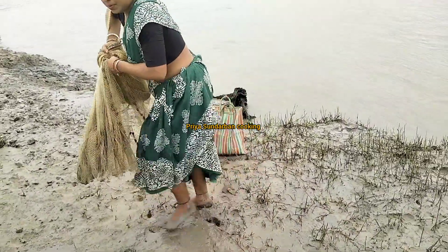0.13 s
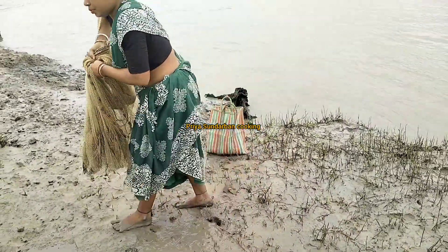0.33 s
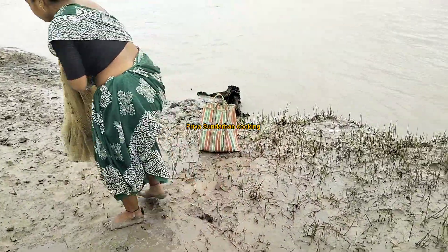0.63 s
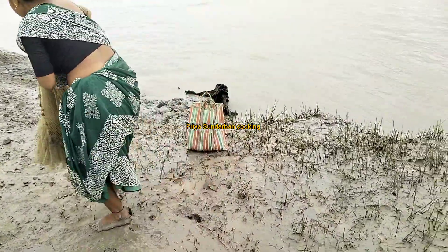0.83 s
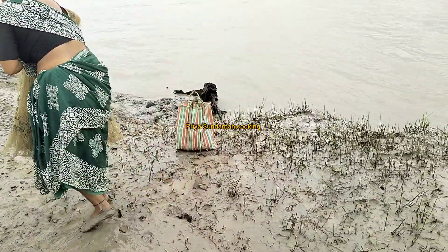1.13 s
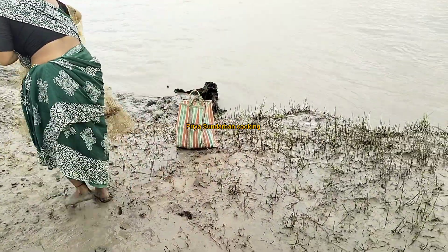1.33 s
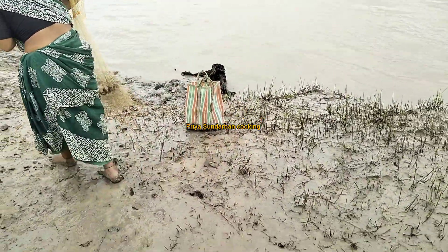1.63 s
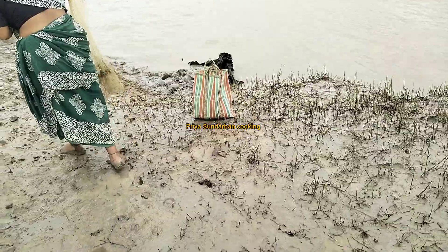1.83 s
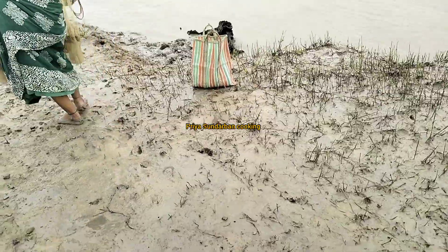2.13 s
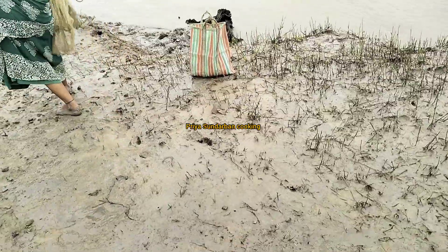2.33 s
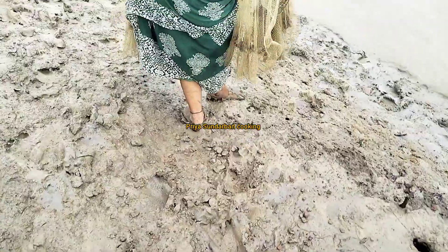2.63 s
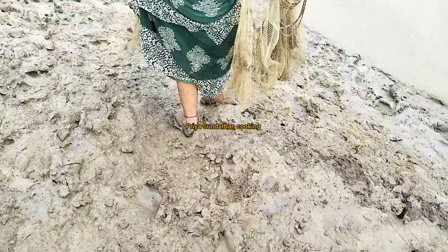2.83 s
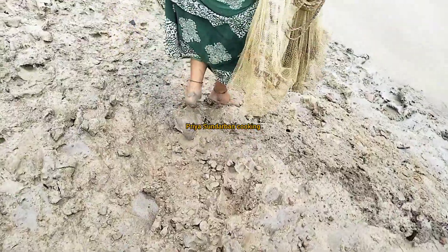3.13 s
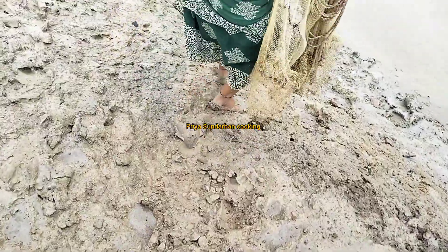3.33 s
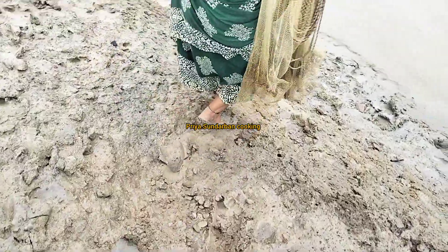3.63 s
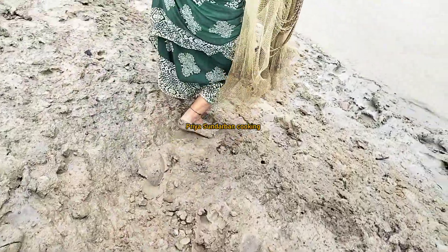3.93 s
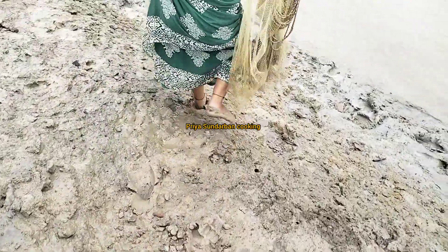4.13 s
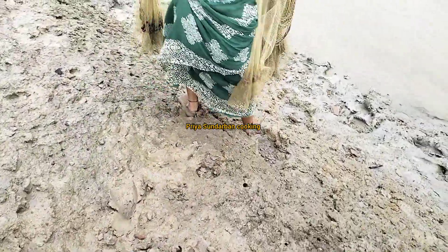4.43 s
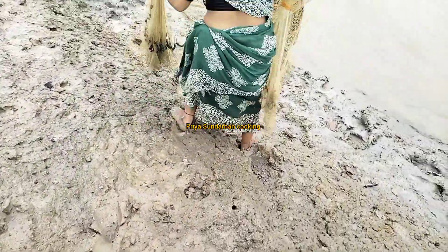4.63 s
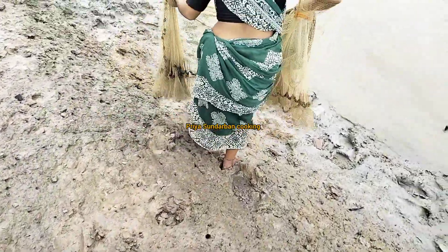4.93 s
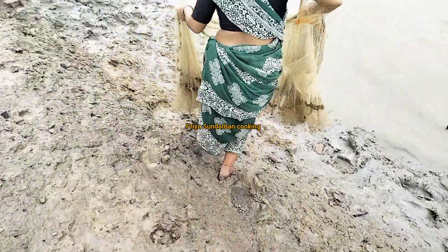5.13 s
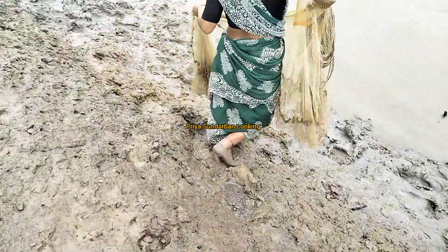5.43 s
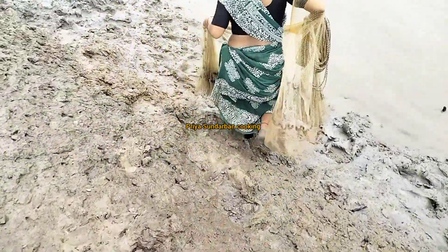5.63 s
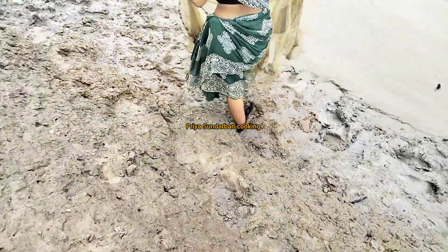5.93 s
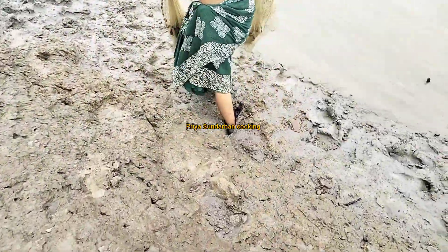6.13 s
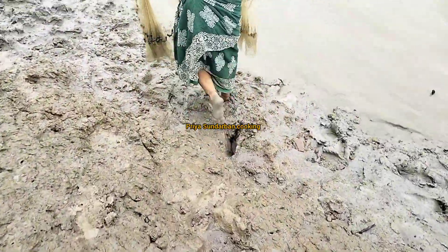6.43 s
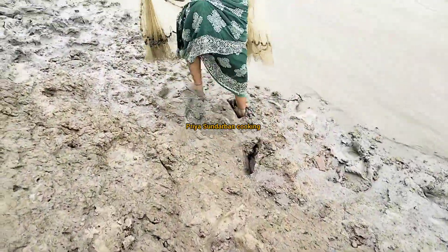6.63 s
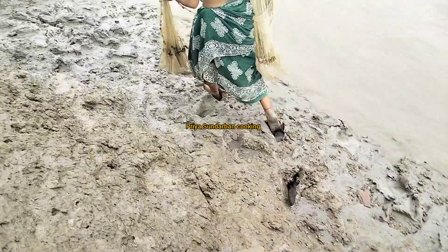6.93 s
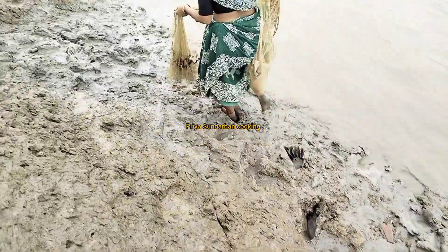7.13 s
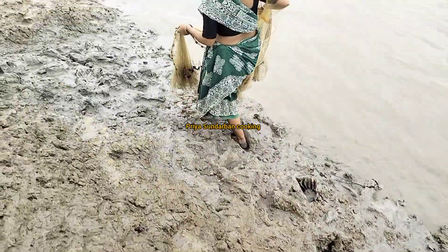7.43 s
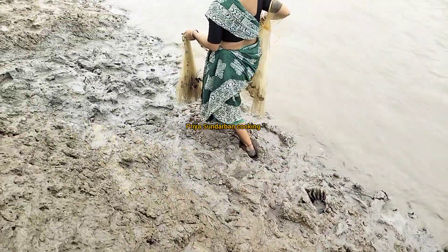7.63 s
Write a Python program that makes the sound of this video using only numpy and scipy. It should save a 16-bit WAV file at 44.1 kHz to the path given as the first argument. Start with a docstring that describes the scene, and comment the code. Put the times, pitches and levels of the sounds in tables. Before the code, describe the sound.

Close, ragged wet mud footsteps with sticky clicks and gurgling seepage over gusty microphone rumble, interrupted by one brief complete silence.

```python
"""Bare feet in riverbank mud

Wet smacks and squelches are ragged noise bursts ringing a footprint and two microphone ports.
Air pockets are gliding sines, heel thuds decaying ones; bubbles are random short sine pops.
Stick-slip jerks and ringing knocks strike mainly the right port; shaped noise makes wind, with a moan.
Seeping water gurgles and fizzes under a brief faint tone; all sound is muted for half a second."""
import sys
import numpy as np
from scipy import signal
from scipy.fft import rfft, irfft, next_fast_len
from scipy.io import wavfile
from scipy.ndimage import uniform_filter1d

SR = 44100
rng = np.random.default_rng(int(sys.argv[2]) if len(sys.argv) > 2 else 0)


def inscribe(sig):
    """Save sig as 16-bit PCM at rate SR to the path in sys.argv[1].

    A 1-D sig is mono; a 2-D sig holds one channel per row.
    Samples are clipped to [-1, 1] before scaling.
    """
    pcm = np.round(np.clip(np.atleast_2d(sig).T, -1, 1) * 32767)
    wavfile.write(sys.argv[1], SR, pcm.astype(np.int16))


N = 343980
FALL = np.log(1000)  # 60 dB decay, nepers
# port resonances and the dip between: (centre_hz, width_hz)
PORT_LOW, PORT_HIGH, PORT_DIP = (5000, 2000), (12900, 3600), (8300, 2500)
MUTE_START_S, MUTE_END_S = 2.4145, 2.92
LAG_BEFORE_SAMPLES, LAG_AFTER_SAMPLES = 19, 5  # right port delay, before and after the mute ends


def undb(db):
    """Gain of a level in dB."""
    return 10 ** (np.asarray(db) / 20)


def unit(x):
    """Scale to rms 1."""
    return x / np.sqrt(np.mean(x ** 2))


def band(x, hz, width_hz):
    """Resonance with gain 1 at the centre."""
    return signal.lfilter(*signal.iirpeak(hz, hz / width_hz, fs=SR), x)


def colour(x, points):
    """Filter by (freq_hz, gain_db) points, then scale to rms 1."""
    size = next_fast_len(N)
    hz, db = np.transpose(points)
    bin_hz = np.arange(size // 2 + 1) * SR / size
    gain = undb(np.interp(np.log(bin_hz + 1), np.log(hz), db, left=-80, right=-80))
    return unit(irfft(rfft(x, size) * gain, size)[..., :N])


def walk(rate_hz):
    """Random levels held 1 / rate_hz, smoothed twice, rms 1."""
    hold = int(SR / rate_hz)
    steps = np.repeat(rng.standard_normal(N // hold + 1), hold)
    smooth = uniform_filter1d(uniform_filter1d(steps, hold), hold)
    return unit(smooth[:N])


def pair(noise, alike):
    """Two channels that share a part of their noise power."""
    alike = np.clip(alike, 0, 1)
    return np.sqrt(alike) * noise[2] + np.sqrt(1 - alike) * noise[:2]


def curves(table):
    """Columns of a breakpoint table at every sample."""
    s, *columns = np.transpose(table)
    return [np.interp(np.arange(N) / SR, s, c) for c in columns]


def sides(left_minus_right_db):
    """Left and right gains."""
    return undb(np.array([left_minus_right_db, -left_minus_right_db]) / 2)


def add(out, start_s, x):
    """Mix x in from start_s."""
    i = int(start_s * SR)
    out[:, i:i + x.shape[1]] += x[:, :N - i]


def late(x):
    """Off-axis sound reaches the right port a few samples after the left."""
    after = np.arange(N) > MUTE_END_S * SR
    right = np.where(after, np.roll(x[1], LAG_AFTER_SAMPLES), np.roll(x[1], LAG_BEFORE_SAMPLES))
    return np.array([x[0], right])


def burst(body_db, hz, low_db, high_db, shape, ragged_db, width, alike, left_db, size, opens=1):
    """Wet mud tears raggedly: the body rings the footprint, the spray rings both port resonances."""
    chance = rng.standard_normal((4, len(shape)))
    ragged = undb(ragged_db * np.repeat(chance[3, ::size], size)[:len(shape)])
    tear = pair(chance, alike) * shape * ragged
    body = band(tear * opens, hz, width * hz)
    body = band(band(body, hz, 1.7 * hz), hz, 1.7 * hz)
    low = band(band(tear, *PORT_LOW), *PORT_LOW)
    high = band(band(tear, *PORT_HIGH), *PORT_HIGH)
    body, low, high = (undb(db) * part / np.abs(part).max()
                       for db, part in ((body_db, body), (low_db, low), (high_db, high)))
    return body + sides(left_db)[:, None] * (low + high)


# wet smacks and ticks; peaks before panning: start_s, body_db, body_hz, spray_db, t60_s (4 ms floor)
SMACK_EVENTS = [(0.037, -35, 1900, -51.5, 0.093), (0.335, -27, 2140, -44, 0.047),
                (0.394, -36, 1630, -44.5, 0.039), (0.542, -36.5, 2250, -46, 0.037),
                (0.604, -14, 2850, -22, 0.011), (0.632, -27, 1350, -23, 0.01),
                (1.107, -38, 2450, -32.5, 0.025), (1.275, -26.5, 2240, -29, 0.03),
                (1.294, -30, 2030, -23, 0.007), (1.344, -21, 1670, -33, 0.041),
                (1.548, -29.5, 3120, -35.5, 0.023), (1.605, -27, 3500, -42, 0.027),
                (1.633, -30.5, 2570, -25, 0.013), (1.689, -33, 1040, -66, 0.056),
                (1.776, -39, 1800, -40, 0.036), (2.145, -41.5, 1120, -39.5, 0.05),
                (2.206, -36, 1980, -43.5, 0.031), (2.302, -24, 1390, -36, .015),
                (2.386, -36, 2230, -38.5, 0.035), (3.108, -29.5, 1590, -55, 0.019),
                (3.159, -32, 1750, -35, 0.0077), (3.2, -54, 3000, -48, 0.013),
                (3.211, -49, 1500, -50, 0.01), (3.225, -54, 2500, -51, .008),
                (3.189, -59, 3050, -45, 0.011), (3.277, -57, 1770, -44.5, 0.0099),
                (3.332, -28.5, 3400, -43, 0.021), (3.367, -34, 3350, -61, 0.0085),
                (3.378, -37, 3380, -54, 0.0079), (3.39, -38, 3400, -51, 0.019),
                (3.717, -39, 1710, -82, 0.03), (3.984, -29, 1200, -38.5, 0.026),
                (4.027, -40, 2140, -43.5, 0.026), (4.425, -40, 1970, -41.5, 0.063),
                (4.489, -35.5, 1690, -65, .015), (4.509, -27.5, 1420, -66, 0.027),
                (4.603, -31, 3130, -74, 0.013), (4.619, -38, 1940, -72, 0.041),
                (4.666, -34.5, 1380, -65, 0.024), (4.793, -38, 1210, -48, 0.0051),
                (5.1599, -21, 1880, -48, 0.021), (5.1691, -19, 1960, -57, 0.018),
                (5.176, -21, 2350, -60, 0.018), (5.1782, -16, 1580, -35, 0.019),
                (5.37, -27, 2440, -39, 0.0073), (5.463, -35.5, 2760, -44, 0.02),
                (6.239, -36, 1770, -32.5, 0.029), (6.3401, -15.5, 2040, -35, 0.026),
                (6.727, -38.5, 1100, -38.5, 0.034), (6.788, -28, 2080, -37, 0.032),
                (6.983, -25.5, 1870, -36, 0.0036), (7.137, -32.5, 1360, -44, 0.0061),
                (7.399, -27, 1720, -41, 0.022), (7.708, -17.5, 3020, -28.5, 0.0095)]
SPRAY_TOP_DB, SPRAY_RISE_DB = -2, 11  # upper against lower resonance at t60 = 26 ms; rise per doubling
SPRAY_LEFT_DB = 13.5  # left minus right, relative to the body


def smacks():
    """A sharp crack excites footprint and ports, then a ragged tail tears."""
    out, t = np.zeros((2, N)), np.arange(SR // 8) / SR
    for start_s, body_db, hz, spray_db, t60_s in SMACK_EVENTS:
        t60_s = max(t60_s, .004)
        tail = np.exp(-FALL * (t / t60_s) ** 1.69)
        crack = 3.5 * np.exp(-t / 0.00074)
        shape = (1 - np.exp(-t / 0.00014)) * (tail + crack)
        top_db = spray_db + SPRAY_TOP_DB + SPRAY_RISE_DB * np.log2(t60_s / 0.026)
        ragged_db = 8.1 * np.clip(t / 0.0029, 0, 1)  # firm crack, torn tail
        smack = burst(body_db, hz, spray_db, top_db, shape, ragged_db, 0.53, 0.42, SPRAY_LEFT_DB, size=40)
        add(out, start_s, sides(-4.0)[:, None] * smack)
    return late(out)


BUBBLES_PER_S, BUBBLE_CYCLES, BUBBLE_SPREAD = 800, 4, 0.26  # envelope peaks at cycles / e; log-pitch spread


def bubbles(hz, shape):
    """Tiny cavities pop at random under an envelope, each a few cycles of its own pitch; peak 1."""
    out, t = np.zeros((2, len(shape))), np.arange(SR // 50) / SR
    # columns: log pitch, size_db, glide, pan_db, log gap
    rows = rng.standard_normal((len(shape) // 50, 5)) * (BUBBLE_SPREAD, 4, .3, 3, 1)
    starts_s = np.cumsum(np.exp(rows[:, 4] - .5) / BUBBLES_PER_S)
    for start_s, (pitch, size_db, glide, pan_db, _) in zip(starts_s, rows):
        if start_s * SR < len(shape) - len(t):
            turns = hz * np.exp(pitch) * t
            swell = turns * np.exp(-turns * np.e / BUBBLE_CYCLES)
            pop = np.sin(2 * np.pi * turns * (1 + glide * turns / 20)) * swell
            i = int(start_s * SR)
            out[:, i:i + len(t)] += sides(pan_db)[:, None] * shape[i] * undb(size_db) * pop
    return out / np.abs(out).max()


# splats and squelches; peaks before panning:
# peak_s, body_db, body_hz, spray_db, t60_s, left_minus_right_db
SPLAT_EVENTS = [(0.6139, -17.5, 1430, -11, 0.061, -4.5), (1.27, -34, 1325, -35.5, 0.088, 2.5),
                (1.73, -48, 2160, -41, 0.022, 8), (1.75, -11, 1900, -12.5, 0.053, -3.5),
                (2.2852, -15.5, 1780, -15, 0.065, -8), (3.361, -45, 815, -63, 0.078, -2),
                (3.172, -38, 1900, -31, 0.04, 0), (3.364, -50, 3470, -62, 0.067, 19.5),
                (4.54, -34, 1890, -41, 0.084, -7.5), (4.791, -46.5, 1780, -45, 0.15, 2),
                (5.352, -38.5, 2400, -74, 0.026, -6), (5.525, -34.5, 2010, -41, 0.12, 0),
                (6.13, -39, 2300, -47, 0.12, 0)]
SWELL_SHARE = 0.73  # swell time / tail time
SPLAT_TOP_DB = -3.5  # upper against lower port resonance, hard splats
HARD_DB = -25  # louder bodies crack and reach both ports together
OPEN_S = 0.0084  # rise constant of a hard splat's body
BUBBLE_DB = 1.5  # bubbles over hiss body


def splats():
    """Mud swells, then bursts: hard splats crack at the peak, long squelches hold and bubble."""
    out, ahead = np.zeros((2, N)), np.zeros((2, N))
    lead_s = 1 / 10
    t = np.arange(SR // 4) / SR - lead_s
    for peak_s, body_db, hz, spray_db, t60_s, pan_db in SPLAT_EVENTS:
        away = np.where(t < 0, -t / SWELL_SHARE, t) / t60_s
        top_db = spray_db + SPLAT_TOP_DB
        pan = sides(pan_db)[:, None]
        if body_db > HARD_DB:
            shape = np.exp(-FALL * away) + 2.5 * np.exp(-np.abs(t) / .0018)
            opens = np.exp(np.minimum(t, 0) / OPEN_S)
            splat = burst(body_db, hz, spray_db, top_db, shape, 2.5, .9, .45, 0, size=90, opens=opens)
            add(ahead, peak_s - lead_s, pan * splat)
        else:
            shape = np.exp(-FALL * away ** 2)
            hiss = burst(body_db - BUBBLE_DB, hz, spray_db, top_db - 6, shape, 4, .45, .8, 0, size=60)
            add(out, peak_s - lead_s, pan * (hiss + undb(body_db) * bubbles(hz, shape)))
    return late(out) + ahead


# air pockets; level before panning and flutter: start_s, level_db, pitch_hz, t60_s, glide_share (over t60)
POCKET_EVENTS = [(2.986, -47, 796, 0.07, 0.34), (4.533, -30.5, 1092, 0.025, 0.26),
                 (5.176, -16.5, 746, 0.0064, -0.16), (4.545, -53, 2670, .07, -0.032),
                 (5.503, -38.5, 2420, 0.038, 0.096), (5.513, -45, 2035, 0.025, 0.17),
                 (5.518, -44, 872, 0.1, 0.46), (5.54, -40.5, 900, 0.037, -0.089),
                 (5.556, -37.5, 1420, 0.017, -1), (5.944, -45, 1960, 0.022, 0.037),
                 (5.997, -37, 2340, 0.032, -0.23), (6.033, -47.5, 1190, 0.045, -0.37),
                 (6.113, -35.5, 656, 0.029, -0.0074), (6.317, -41.5, 1460, 0.05, 1),
                 (6.34, -31, 482, 0.034, 0.17), (7.027, -39.5, 766, 0.094, 0.8),
                 (7.069, -41.5, 752, 0.048, -.3), (7.168, -42.5, 1414, 0.049, 0.37)]


def pockets():
    """Air pockets ring as they close or open: gliding sines roughened by quivering wet walls."""
    out, t = np.zeros((2, N)), np.arange(SR // 8) / SR
    for start_s, level_db, hz, t60_s, glide in POCKET_EVENTS:
        flutter = uniform_filter1d(rng.standard_normal(len(t)), size=100) * 10
        pitch_hz = hz * (1 + glide * np.minimum(t / t60_s, 1) + 0.022 * flutter)
        turn = 2 * np.pi * np.cumsum(pitch_hz) / SR
        decay = np.exp(-FALL * (t / t60_s) ** 1.6 + 0.48 * flutter[::-1])
        shape = (1 - np.exp(-t / 0.001)) ** 2 * decay
        add(out, start_s, sides(-4.0)[:, None] * undb(level_db) * shape * np.sin(turn))
    return late(out)


# heel landings; peak before panning: start_s, level_db, pitch_hz, t60_s
THUD_EVENTS = [(0.034, -35, 80, 0.15), (2.2972, -20.5, 116, 0.0039), (2.372, -31.5, 197, 0.044),
               (3.38, -29, 67, 0.048)]


def thuds():
    """A landing heel makes a dull low sine that decays."""
    out, t = np.zeros((2, N)), np.arange(SR // 8) / SR
    for start_s, level_db, hz, t60_s in THUD_EVENTS:
        swing = np.sin(2 * np.pi * hz * t) * (1 - np.exp(-t / 0.0038)) * np.exp(-FALL * t / t60_s)
        add(out, start_s, undb(level_db) * sides(-1.1)[:, None] * swing / np.abs(swing).max())
    return out


# rub spectrum: freq_hz, gain_db
RUB_SPECTRUM = [(100, 2), (250, -7.5), (800, -18), (1400, -13.5), (2100, -25.5), (6000, -38)]
DRAG_START_S, DRAG_END_S, DRAG_DB = .62, 1.06, -46.5  # level before port gains
DRAG_JOLT_DB, DRAG_JOLT_S, DRAG_EDGE_S = 19.5, 0.043, 0.0027  # extra level at onset, its decay; edge ramps


def drag():
    """Stick and slip at the right port: uneven one-way jerks, sharp or blunt, with noisy scratches."""
    chance = rng.standard_normal((N // 50, 3)).T
    at = np.cumsum(1 + SR / 230 * np.exp(.5 * chance[0])).astype(int)
    inside = at < N
    slips, sharp = np.zeros(N), np.zeros(N)
    slips[at[inside]] = -undb(3.5 * chance[1][inside])
    sharp[at[inside]] = chance[2][inside] > 0
    blunt = uniform_filter1d(uniform_filter1d(slips * (1 - sharp), size=18), size=18)
    decay = np.exp(-1 / (0.00053 * SR))
    scratch = signal.lfilter([1], [1, -decay], slips) * rng.standard_normal(N)
    rub = colour(slips * sharp + 2.3 * blunt + 0.32 * scratch, RUB_SPECTRUM)
    t = np.arange(N) / SR - DRAG_START_S
    hold = np.clip(np.minimum(t, DRAG_END_S - DRAG_START_S - t) / DRAG_EDGE_S, 0, 1)
    level_db = DRAG_DB + DRAG_JOLT_DB * np.exp(-np.abs(t) / DRAG_JOLT_S)
    return rub * hold * undb(level_db) * np.array([[.25], [1.3]])


# right-port knocks; crack and edge are peaks, thump a gain:
# start_s, crack_db, crack_hz, edge_db, thump_db, thump_hz, first_swing (1 out, -1 in)
KNOCK_EVENTS = [(1.7889, -12, 870, -47, -28, 126, 1), (1.7913, -10.5, 1520, -39, -11.5, 48.6, 1),
                (1.8357, -12.5, 666, -42, -14, 68, 1), (1.868, -31.5, 624, -65, -38, 76.2, 1),
                (4.3894, -2.5, 1336, -12.5, -19.5, 105, -1), (4.9288, -8, 1260, -28, -21, 128, -1),
                (5.026, -31.5, 413, -69, -30, 110, -1), (5.664, -30.5, 352, -72, -25, 108.5, -1),
                (6.199, -19.5, 260, -67, -50, 118, -1), (6.2194, -6.5, 1350, -18.5, -23.5, 116, -1)]
KNOCK_CYCLES = 4.4  # to fall 60 dB
SCUFF_DB, SCUFF_S = -33, 0.018  # gritty tail against the thump gain; decay constant


def knocks():
    """A blunt pulse rings the right port; its membrane is pulled in and swings back in a gritty thump."""
    out, t = np.zeros((2, N)), np.arange(SR // 8) / SR
    for start_s, crack_db, hz, edge_db, thump_db, thump_hz, swing in KNOCK_EVENTS:
        onset = 1 - np.exp(-(t * hz / 0.13) ** 2)
        crack = swing * np.sin(2 * np.pi * hz * t) * np.exp(-FALL * t * hz / KNOCK_CYCLES) * onset
        edge = np.exp(-t / 0.00086) * rng.standard_normal(len(t))
        ring = band(band(edge, *PORT_LOW), PORT_LOW[0], 6000)
        ring = ring + .2 * band(band(edge, *PORT_HIGH), *PORT_HIGH)
        rebound = np.sin(2 * np.pi * thump_hz * (t - .004)) * (t > .004) * np.exp(-1.1 * thump_hz * t)
        pull = 0.68 * np.exp(-((t - .0036) / 0.0011) ** 2)
        grit = band(band(rng.standard_normal(len(t)) ** 3, 990, 1800), 990, 1800)
        scuff = unit(grit) * np.exp(-t / SCUFF_S)
        blow = undb(crack_db) * crack / np.abs(crack).max()
        blow = blow + undb(edge_db) * ring / np.abs(ring).max()
        blow = blow + undb(thump_db) * (rebound - pull + undb(SCUFF_DB) * scuff)
        add(out, start_s, np.array([[.03], [1]]) * blow)
    return out


# gust levels before modulation and panning: time_s, rumble_db, buffet_db
GUSTS = [(0.0, -39.5, -56.5), (0.2, -56, -62), (0.5, -36, -63.5), (0.72, -41, -58.5), (1.04, -49.5, -57),
         (1.12, -46, -66), (2.2, -45.5, -62), (2.4, -37.5, -53), (2.93, -59.5, -61), (3.2, -47.5, -64.5),
         (3.86, -42.5, -53.5), (4.1, -48, -64.5), (4.4, -43.5, -53), (4.75, -48, -66), (5.04, -40.5, -50),
         (5.42, -49.5, -54.5), (5.65, -40.5, -65), (5.95, -47.5, -54), (6.3, -43, -64), (6.93, -39.5, -57),
         (7.28, -47.5, -60), (7.8, -47, -48.5)]
# rumble side: time_s, left_minus_right_db
RUMBLE_LEAN = [(0, -15), (.45, 12), (1.7, 4), (2.2, 5.5), (3.25, 8.5), (4.1, -6.5), (6.4, -8), (6.9, 1.5),
               (7.8, -4)]
# rumble spectrum: freq_hz, gain_db
RUMBLE_SPECTRUM = [(15, -44), (30, 1), (60, -0.5), (100, -4), (160, -18), (300, -38.5)]
# buffeting spectrum: freq_hz, gain_db
BUFFET_SPECTRUM = [(100, -20), (170, -1.5), (280, -5.5), (370, -16), (700, -27), (1500, -45)]
MOAN_HZ, MOAN_HZ_PER_DB = 214.2, 5.5  # pitch at mean gust level; rise with gust
MOAN_WALK_HZ, MOAN_DB = 35, -7  # modulation rate; level against puffs


def wind():
    """Gusts shake each port almost on its own; buffeting comes in puffs and moans higher as it swells."""
    rumble_db, buffet_db = curves(GUSTS)
    rumble = colour(pair(rng.standard_normal((3, N)), 0.24), RUMBLE_SPECTRUM)
    rumble = rumble * undb(rumble_db + 3.7 * np.array([walk(7.8), walk(11)]))
    puffs = colour(pair(rng.standard_normal((3, N)), 0.85) * undb(1.9 * walk(30)), BUFFET_SPECTRUM)
    pitch_hz = MOAN_HZ + MOAN_HZ_PER_DB * (buffet_db - buffet_db.mean()) + 12 * walk(6.7)
    turn = 2 * np.pi * np.cumsum(pitch_hz) / SR
    moan = unit(walk(MOAN_WALK_HZ) * np.sin(turn) + walk(MOAN_WALK_HZ) * np.cos(turn))
    buffet = (puffs + undb(MOAN_DB) * moan) * undb(buffet_db)
    return rumble * sides(*curves(RUMBLE_LEAN)) + buffet * sides(-0.41)[:, None]


def grains(per_s, spread_db):
    """Random clicks of very uneven size, heard at both ports from random sides."""
    hits = (rng.random(N) < per_s / SR) * undb(spread_db * rng.exponential(size=N))
    hits = hits * rng.choice([-1, 1], N)
    return unit(late([hits, hits]) * sides(23.0 * walk(28)))


# seeping water, levels before panning: time_s, gurgle_db, fizz_db
SEEP_LEVELS = [(0.0, -59.5, -57), (0.53, -58.5, -55.5), (0.85, -62, -63), (1.2, -61.5, -59),
               (1.7, -59.5, -55), (1.95, -66, -71), (2.25, -59, -56), (2.93, -65, -67), (3.2, -62.5, -68.5),
               (3.55, -69.5, -69.5), (3.94, -57.5, -67.5), (4.2, -63.5, -67.5), (4.97, -62.5, -60),
               (5.5, -60, -60.5), (5.85, -65.5, -68.5), (6.2, -50.5, -56), (6.55, -61, -71),
               (6.95, -55.5, -57.5), (7.2, -57.5, -69), (7.4, -61, -57), (7.6, -63.5, -67),
               (7.8, -58.5, -55.5)]
# gurgle spectrum: freq_hz, gain_db
GURGLE_SPECTRUM = [(300, -3), (600, -6), (900, -4.5), (1500, -6), (2200, -5), (3000, -18), (4500, -21.5)]
# fizz spectrum: freq_hz, gain_db
FIZZ_SPECTRUM = [(2500, -3), (5000, -9), (6500, -8.5), (7200, -14), (10200, -13), (13000, -11.5),
                 (15500, -10.5), (18000, 2.5)]


def seep():
    """Water pressed out of mud: patchy noise and clicks ring cavities; short spits hiss in the ports."""
    gurgle_db, fizz_db = curves(SEEP_LEVELS)
    gurgle = 0
    for hz in np.geomspace(450, 4500, num=12):
        # each cavity size swells and pops on its own
        patchy = unit(pair(rng.standard_normal((3, N)), .3) * undb(4.5 * walk(70)))
        cavity = band(band(patchy + .7 * grains(40, 2), hz, hz / 9), hz, hz / 4)
        gurgle = gurgle + unit(cavity) * np.sqrt(hz)
    fizz, shared = 0, np.abs(grains(70, 3))
    decay = np.exp(-1 / (.0008 * SR))
    for hz, width_hz in (PORT_LOW, PORT_HIGH):
        # some spits excite both resonances, some one
        spits = signal.filtfilt([1], [1, -decay], shared + np.abs(grains(80, 3)))
        hiss = rng.standard_normal((2, N)) * (undb(3.5 * walk(70)) + 1.5 * unit(spits))
        fizz = fizz + unit(band(hiss, hz, 1.6 * width_hz)) * np.sqrt(width_hz)
    return (colour(gurgle, GURGLE_SPECTRUM) * undb(gurgle_db) * sides(-5.0)[:, None]
            + colour(fizz, FIZZ_SPECTRUM) * undb(fizz_db) * sides(2.9)[:, None])


WHINE_HZ, WHINE_DB, WHINE_END_S = 1642, -61, .37  # peak before panning


def whine():
    """A thin sine, wavering in pitch, that fades out early."""
    t = np.arange(N) / SR
    turn = 2 * np.pi * np.cumsum(WHINE_HZ * (1 + 0.0038 * walk(57))) / SR
    fade = np.clip((WHINE_END_S - t) / .04, 0, 1)
    return undb(WHINE_DB) * fade * np.sin(turn) * sides(-10)[:, None]


def scene():
    """All sources at the two ports."""
    feet = smacks() + splats() + pockets() + thuds()
    return feet + drag() + knocks() + wind() + seep() + whine()


TOP_HZ = 16000


def record(dry):
    """The ports dip between their resonances; the sound mutes briefly; a low-pass cuts the top."""
    t = np.arange(N) / SR
    ports = dry - 0.26 * band(dry, *PORT_DIP)
    edges_s = [MUTE_START_S - .001, MUTE_START_S, MUTE_END_S, MUTE_END_S + .002]
    mute = np.interp(t, edges_s, [1, 0, 0, 1])
    low_pass = signal.ellip(8, .2, 70, TOP_HZ, fs=SR, output="sos")
    return signal.sosfilt(low_pass, ports * mute)


dry = scene()
out = record(dry)
inscribe(out)
```